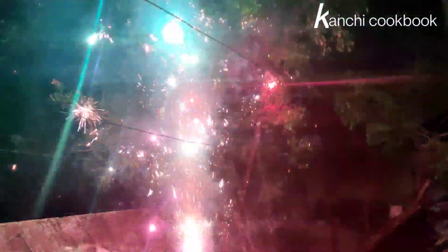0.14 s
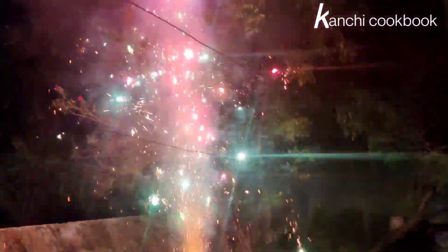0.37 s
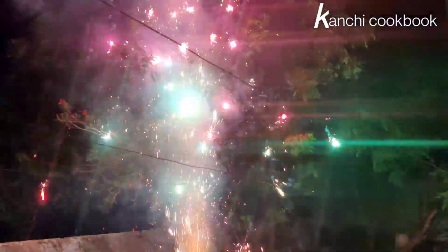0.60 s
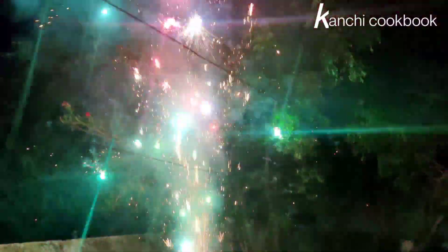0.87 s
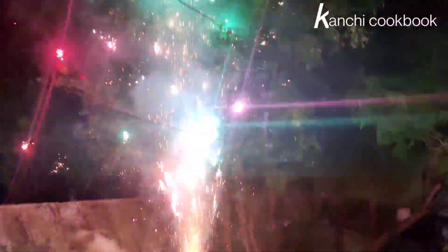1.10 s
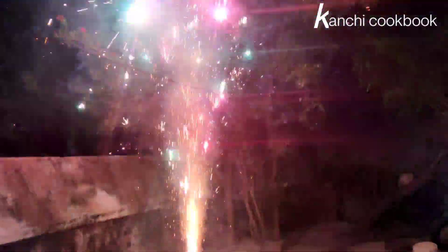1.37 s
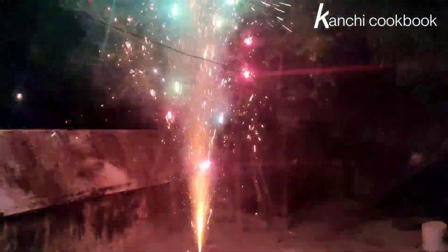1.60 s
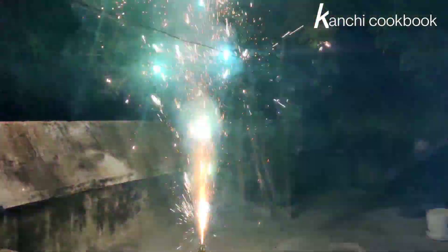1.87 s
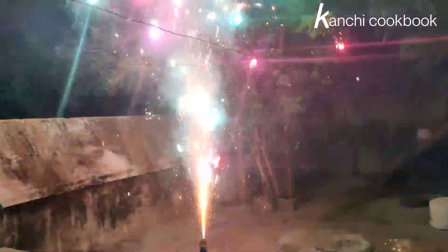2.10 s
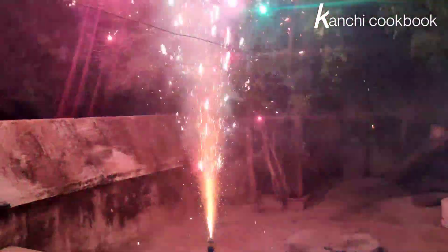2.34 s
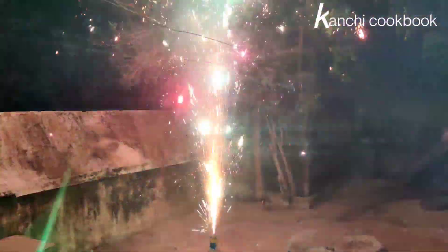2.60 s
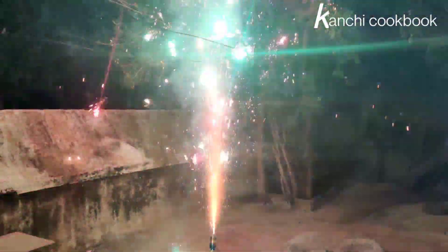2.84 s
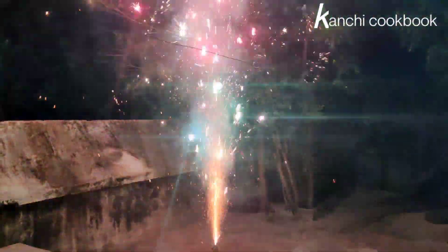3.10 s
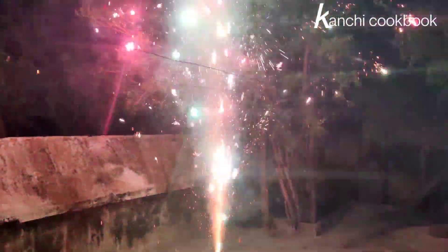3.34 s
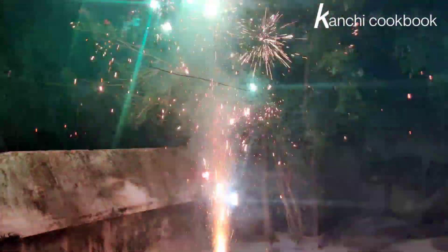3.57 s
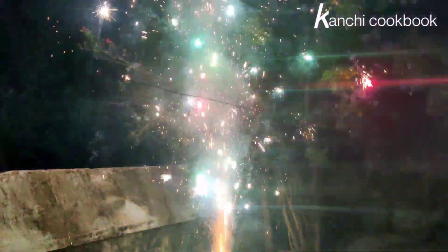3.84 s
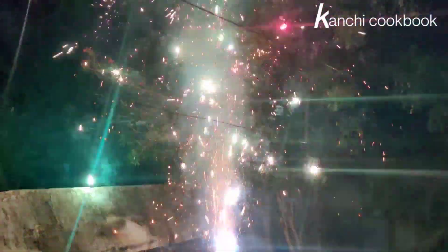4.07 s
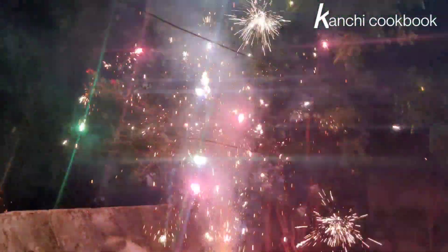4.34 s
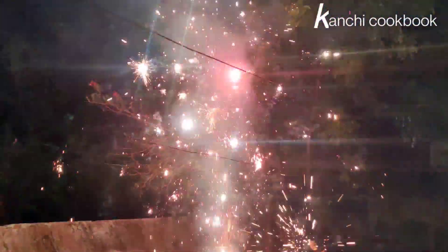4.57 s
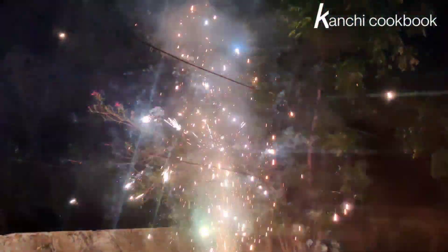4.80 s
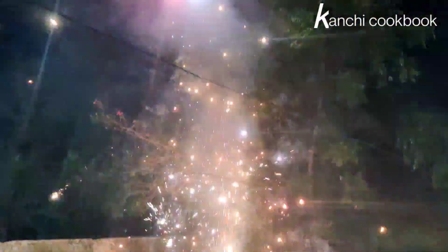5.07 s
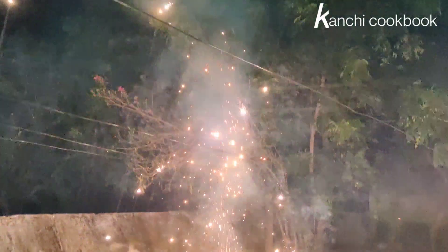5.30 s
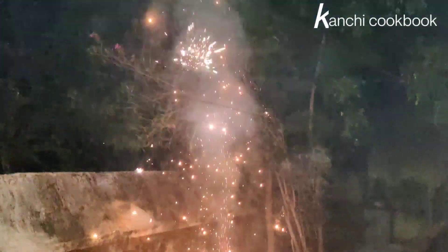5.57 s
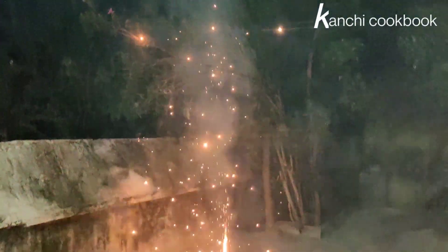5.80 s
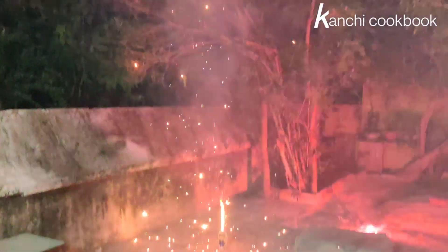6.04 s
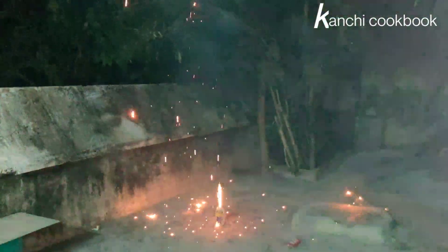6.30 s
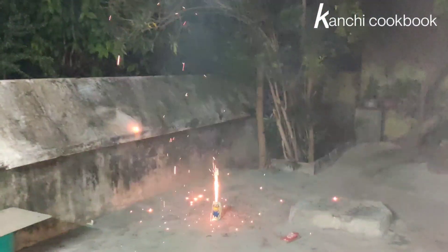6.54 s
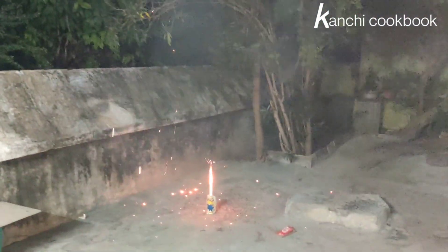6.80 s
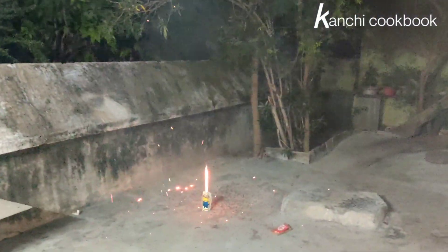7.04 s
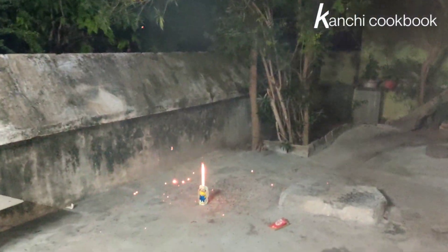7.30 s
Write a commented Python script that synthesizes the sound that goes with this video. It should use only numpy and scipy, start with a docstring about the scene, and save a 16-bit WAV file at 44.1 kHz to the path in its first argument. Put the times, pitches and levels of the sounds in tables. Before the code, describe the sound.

Harsh, fluctuating jet noise and dense tiny crackles start at once, with snapping star bursts, hollow thumps and quick slaps from ground and walls. The close stereo phone pickup clips, lurches and cuts out in places. Bursts peak past the middle, some late ones with short woody knocks. Then the hiss drops away to a weak sputter over a distant hum, with thin, high crickets emerging.

```python
"""A fountain firework burns in a walled yard at night, a few metres from a phone with two microphone ports.
From the start a jet of shaped noise hisses over a far hum, amid the sizzle of dense tiny impulses.
Stars soon burst as sharp spikes with ground bounces and hollow thumps; late on, decaying sines knock.
Meanwhile the microphones' resting points lurch and swing into clipping, which chokes the hiss.
At last the burn sinks to a faint glow, the hum, and crickets made of slightly wavering sines."""
import sys
import numpy as np
from scipy import signal
from scipy.fft import rfft, irfft
from scipy.io import wavfile
from scipy.ndimage import uniform_filter1d, minimum_filter1d

SR = 44100
rng = np.random.default_rng(int(sys.argv[2]) if len(sys.argv) > 2 else 0)


def waveform_to_disk(signal):
    """Save audio, clipped to [-1, 1], as 16-bit WAV at the path in sys.argv[1]."""
    frames = np.transpose(np.atleast_2d(signal))
    scaled = np.clip(frames, -1, 1) * 32767
    samples = np.round(scaled).astype(np.int16)
    wavfile.write(sys.argv[1], SR, samples)


def natural_amplitude(level_db):
    """Convert a level in decibels to a linear amplitude factor, elementwise."""
    exponent = np.asarray(level_db, float) / 20
    return 10 ** exponent


N = 326781  # length in samples


def shaped(x, points):
    """Minimum-phase filtering: (Hz, dB) points become a causal filter by folding the cepstrum of the log gain."""
    hz, db = np.transpose(points)
    grid = np.maximum(np.fft.rfftfreq(4096, 1 / SR), 1)
    log_gain = np.log(natural_amplitude(np.interp(np.log(grid), np.log(hz), db)))
    cepstrum = irfft(log_gain)
    cepstrum[1:2048] *= 2
    cepstrum[2049:] = 0
    response = irfft(np.exp(rfft(cepstrum)))[None, :2048]
    return signal.fftconvolve(x, response, axes=1)[:, :N]


def band(x, hz, width_hz):
    """Simple resonance: a second-order peak with gain 1 at its centre."""
    return signal.lfilter(*signal.iirpeak(hz, hz / width_hz, SR), x)


def level(x, db):
    """Root-mean-square scaling: the whole signal is brought to one rms level in dB."""
    return x * natural_amplitude(db) / np.sqrt(np.mean(x ** 2))


def curve(table):
    """Linear interpolation: rows of (seconds, value) are joined by straight lines."""
    return np.interp(np.arange(N) / SR, *np.transpose(table))


def walk(rate_hz):
    """Smoothed random modulation: random levels are held for one period and slewed twice; spread near 1."""
    hold = int(SR / rate_hz)
    steps = np.repeat(rng.standard_normal(N // hold + 1), hold)
    return uniform_filter1d(uniform_filter1d(steps, hold), hold)[:N] * 4 / 3


def clicks(seconds, sizes, lag_s):
    """Interaural-style delay: each impulse has its own direction, so it reaches the right port early or late."""
    at = np.clip((np.array([seconds, seconds + lag_s]) * SR).astype(int), 0, N - 1)
    return np.array([np.bincount(port, sizes, N) for port in at])


def decay(x, seconds):
    """Exponential relaxation: a one-pole filter prolongs each input by the given time constant."""
    return signal.lfilter([1], [1, -np.exp(-1 / (seconds * SR))], x)


def yard(x, t60_s, wet_db):
    """Diffuse reverberation: scattered echoes from ground, wall and trees decay, different at each port."""
    t = np.arange(int(.3 * SR)) / SR
    echo = rng.standard_normal((2, len(t))) * 1000 ** (-t / t60_s) * (t > .002)
    echo /= np.sqrt(np.sum(echo ** 2, axis=1, keepdims=True))
    return x + natural_amplitude(wet_db) * signal.fftconvolve(x, echo, axes=1)[:, :N]


# Flares of the charge, one after another and overlapping.
# Each row: start in seconds, relative level in dB, rise in seconds, hold in seconds.
FLARES = [(-0.005, -23.5, 0.0022, 0.093), (0.115, -22.5, 0.089, 0.091), (0.293, -20, 0.13, 0),
          (0.342, -22.5, 0.062, 0.29), (0.67, -23.5, 0.027, 0.061), (0.836, -28, 0.0012, 0.25),
          (0.862, -26, 0.047, 0.13), (1.113, -25.5, 0.002, 0.08), (1.2, -22.5, 0.063, 0.29),
          (1.204, -22.5, 0.001, 0.065), (1.496, -22.0, 0.029, 0.23), (1.764, -28.5, 0.035, 0.085),
          (1.878, -28.5, 0.032, 0.019), (1.924, -30, 0.047, 0.324), (2.006, -23, 0.0011, 0.051),
          (2.136, -24.5, 0.022, 0.038), (2.245, -26, 0.088, 0.25), (2.267, -22.5, 0.0015, 0.096),
          (2.465, -22.5, 0.044, 0.1), (2.517, -26.5, 0.13, 0.27), (2.684, -22.5, 0.079, 0.063),
          (2.824, -21.5, 0.065, 0.23), (3.124, -19, 0.006, 0.02), (3.246, -19.0, 0.098, 0.02),
          (3.313, -23, 0.063, 0.25), (3.56, -26, 0.087, 0.3), (3.586, -28, 0.021, 0.2),
          (3.67, -20.5, 0.062, 0.001), (3.767, -27, 0.0067, 0.02), (3.852, -24.5, 0.057, 0.32),
          (3.945, -14.5, 0.05, 0.034), (4.123, -12, 0.073, 0), (4.176, -29, 0.081, 0.25),
          (4.272, -20.5, 0.038, 0.044), (4.436, -21.5, 0.019, 0.045), (4.491, -22, 0.045, 0.22),
          (4.594, -18, 0.017, 0.059), (4.774, -21, 0.002, 0.0086), (4.779, -21.5, 0.029, 0.03),
          (4.851, -24, 0.04, 0.077), (4.99, -21, 0.0089, 0.071), (5.1, -28.5, 0.003, 0.013),
          (5.158, -27, 0.012, 0.024), (5.238, -16, 0.069, 0.00033), (5.227, -24.5, 0.0011, 0.028),
          (5.278, -27.5, 0.0017, 0.052), (5.368, -26, 0.07, 0.088), (5.39, -24, 0.001, 0.028),
          (5.585, -25, 0.022, 0.17), (5.5853, -22, 0.0009, 0.015), (5.826, -30, 0.015, 0.26),
          (5.9715, -27.5, 0.0017, 0.027), (6.058, -38, 0.044, 0.074), (6.199, -23.5, 0.0026, 0.093),
          (6.458, -40, 0.022, 0.25), (6.661, -24.5, 0.00093, 0.01)]
# The steady burn under the flares, from full tube to last glow. Each row: time in seconds, relative level in dB.
EMBER = [(0, -36.5), (5.9, -35.5), (6.35, -45), (7.41, -49.5)]


def burn_db():
    """Energy summation: flares rise, hold and fade at one rate; their powers add over the steady burn."""
    fade_db_per_s = 366
    t = np.arange(0, N / SR + .002, .001)[:, None]
    start, db, rise, hold = np.transpose(FLARES)
    fade_db = fade_db_per_s * np.maximum(t - start - rise - hold, 0)
    flares = natural_amplitude(db - fade_db) * np.clip((t - start) / np.maximum(rise, .001), 0, 1)
    ember = natural_amplitude(np.interp(t[:, 0], *np.transpose(EMBER)))
    power = np.sum(flares ** 2, axis=1) + ember ** 2
    return curve(np.c_[t, 10 * np.log10(power)])


# Colour of the burn before the ports. Each row: frequency in Hz, relative spectral density in dB per Hz.
BURN_COLOUR = [(30, 0.5), (150, -7.5), (300, 1), (500, -3.5), (1200, -1), (2000, 0.5), (3500, 2.5),
               (7000, 1), (12000, -0.5), (16000, -5)]


def burn(count=1500, size=5):
    """Turbulent noise with clustered impulses: the jet hisses under flurries of cracks as stars break up."""
    star, star_side, star_size = rng.random((count, 3, 1)).transpose(1, 0, 2)
    late, spark = -np.log(1 - rng.random((2, count, size)))
    when = star * N / SR + .006 * late
    # few large and many small
    spark_db = np.minimum(2.25 * spark + 8 * star_size, 24)
    loud_db = burn_db()
    lag = np.repeat(.0008 * (star_side - .5), size)
    cracks = clicks(when.ravel(), natural_amplitude(spark_db).ravel(), lag)
    cracks = level(signal.lfilter([1, -.4], [1], cracks - cracks.mean()), 0)
    # every spark sits somewhere else, so the yard answers each with its own short wash
    wash = np.sqrt(decay(cracks ** 2, 0.015)) * rng.standard_normal((2, N))
    cracks = cracks + level(wash, -3.5)
    # a weak burn throws few stars: mostly hiss
    cracks *= np.clip((loud_db + 31.0) / 22, 0, 1)
    # long waves reach both ports alike
    shared = signal.lfilter(*signal.butter(1, 500, fs=SR), rng.standard_normal(N))
    jet = rng.standard_normal((2, N)) + natural_amplitude(3.0) * shared
    # the jet is thin in the middle, where the cracks stand out
    jet = jet - 0.5 * band(jet, 1480, 1260)
    mix = shaped(level(jet, -6.0) + level(cracks, -3.5), BURN_COLOUR)
    return level(mix, -1.43) * natural_amplitude(loud_db)


# Spectrum of the night air. Each row: frequency in Hz, relative spectral density in dB per Hz.
NIGHT = [(24, -46), (40, 9.5), (123, -8.5), (186, -12.5), (415, -17), (1070, -23.5), (2000, -32.5),
         (4300, -29), (6600, -45), (14000, -48)]


def air():
    """Stationary broadband noise: a far hum, shaped towards the low end and steady in level."""
    return level(shaped(rng.standard_normal((2, N)), NIGHT), -41.5)


# Star bursts. Each row: start in seconds, relative spike level in dB, thump relative to crack in dB.
POPS = [(0.1328, -13, -17), (0.2074, -18.5, -6), (0.281, -5, -25), (0.444, -8, -28), (0.5082, -6, -27),
        (0.571, -1, -27.5), (0.7317, -8, -30), (0.8398, -19.5, -11.5), (0.9393, -3.5, -26),
        (0.9584, -4, -33), (1.054, -9, -21.5), (1.11, -8, -28), (1.155, -6, -27), (1.2061, -4.5, -26),
        (1.2206, -6.5, -15.5), (1.253, 0.5, -28), (1.3516, -6, -46), (1.4108, -3, -27.5),
        (1.447, -1.5, -27), (1.5932, -12, -33), (1.6487, -4, -26), (1.8275, -9, -25), (1.8423, -11, -15.5),
        (1.8603, -11, -20.5), (2.0103, -3.5, -25), (2.0154, -13, -11), (2.1132, -9, -18.5),
        (2.1433, -11.5, -14.5), (2.273, -8, -17), (2.2868, -12, -28), (2.5116, -3.5, -20.5),
        (2.7625, -5, -23), (2.7973, -9, -18.5), (2.8838, -4.5, -29), (2.9219, -9, -25), (2.9498, -14, -19),
        (3.1536, -6, -33), (3.182, -14, -24), (3.2791, -7, -23.5), (3.3675, -6.5, -26), (3.484, -5.5, -26),
        (3.5435, -9, -29), (3.586, -6, -25), (3.7838, 0.5, -31), (3.7959, -2.5, -26), (3.8566, -14.5, -19),
        (3.948, -11, -12), (3.9793, -5, -19), (4.0092, -1.5, -18), (4.0531, -10, -17.5),
        (4.112, -13.5, -16.5), (4.131, -10, -21), (4.1514, -2.5, -14.5), (4.1899, 7, -26),
        (4.2257, -12, -16.5), (4.2812, -13.5, -18), (4.3001, -6, -24), (4.359, -3, -25.5),
        (4.414, -18, -15.5), (4.484, -6.5, -18.5), (4.5378, -1.5, -24), (4.6054, 1.5, -22.5),
        (4.6113, -2, -17), (4.6214, -1, -21), (4.6278, -4, -13), (4.6637, -7, -32), (4.7072, -5, -24),
        (4.773, -9, -24), (4.8, -7, -20), (4.8302, 0, -29), (4.886, -10.5, -14), (4.9837, -5, -19.5),
        (5.004, -6.5, -19), (5.0451, -6.5, -20), (5.073, -4, -32), (5.0974, -14, -19), (5.2262, -4.5, -20),
        (5.2795, -2.5, -27), (5.303, 0, -32), (5.3945, -16, -12.5), (5.4812, 3, -26), (5.5884, -6.5, -22),
        (5.6013, -1.5, -25), (5.6798, 1.5, -27), (5.7253, -6.5, -24.5), (5.7542, -7.5, -26),
        (5.9767, -7.5, -20), (6.0418, -10.5, -22), (6.2015, -6, -17), (6.215, -4.5, -49),
        (6.6572, -15, -54), (6.6663, -9.5, -27)]
# Hollow body of a burst. Each row: resonance in Hz, width in Hz, gain in dB.
THUMP = [(380, 1210, 32.5), (760, 430, 25)]


def pops(count=2):
    """Impulse with early reflections: a spike, ground bounces some 2 ms apart, a thump and the yard's reply."""
    start, db, thump_db = np.transpose(POPS)
    chance = rng.random((len(start), 2 * count + 1))
    late = np.c_[0 * start, np.cumsum(.0019 + .0007 * chance[:, :count], axis=1)]
    loss_db = np.c_[0 * start, np.cumsum(2.5 + 4 * chance[:, count:-1], axis=1)]
    size = natural_amplitude(db[:, None] - loss_db)
    lag = np.repeat(0.00017 * (chance[:, -1] - .5), count + 1)
    when = (start[:, None] + late).ravel()
    spikes = clicks(when, size.ravel(), lag)
    # the shell tears for a fraction of a millisecond behind the spike
    tear = decay(spikes, 0.00022) * rng.standard_normal((2, N))
    crack = signal.lfilter([.7, -.14, -.42], [1, -.3], spikes + natural_amplitude(-2.0) * tear)
    push = clicks(when, (size * natural_amplitude(thump_db[:, None])).ravel(), lag)
    thump = sum(natural_amplitude(gain_db) * band(push, hz, width) for hz, width, gain_db in THUMP)
    dulled = signal.lfilter(*signal.butter(1, 9000, fs=SR), crack)
    # the low end lingers longer between the walls
    return yard(natural_amplitude(4) * dulled, .05, -11) + yard(thump, 0.13, -2.2)


# Short hollow knocks, each on its own note.
# Each row: start in seconds, peak level in dB before the yard's echoes, frequency in Hz.
KNOCKS = [(5.279, -14, 1185), (5.589, -24, 960), (5.686, -24, 1140), (6.012, -24.5, 910), (6.657, -22, 870),
          (6.669, -19, 683)]


def knocks():
    """Damped free vibration: each knock is an exponentially dying note, prolonged by the yard."""
    t60_s = 0.023
    t = np.arange(N) / SR
    notes = np.zeros(N)
    for start, db, hz in KNOCKS:
        fade = 1000. ** (-np.abs(t - start) / t60_s) * (t > start)
        notes += natural_amplitude(db) * np.sin(2 * np.pi * hz * (t - start)) * fade
    return yard(np.array([notes, notes]), 0.25, -1)


# Cricket songs; a row that starts beyond the scene's end stays silent.
# Each row: mean frequency in Hz, mean peak level in dB, start in seconds, end in seconds.
CRICKETS = [(2980, -64, 6.45, 6.68), (3640, -59.5, 6.72, 8.8), (4170, -62, 6.2, 8.6), (4400, -66, 18, 8.3),
            (4550, -63, 6.75, 8.6), (5717, -69, 8.1, 8.7)]


def crickets():
    """Slow frequency and amplitude modulation: thin sines waver slightly in pitch and level."""
    song = np.zeros(N)
    for hz, db, start, end in CRICKETS:
        phase = 2 * np.pi * np.cumsum(hz + 12 * walk(40)) / SR
        loud = natural_amplitude(db + 1.8 * walk(12))
        gate = curve([(start - .05, 0), (start, 1), (end, 1), (end + 0.031, 0)])
        song += np.sin(phase) * loud * gate
    return song


# Resonances of the left, then the right microphone port. Each row: centre in Hz, width in Hz, gain in dB.
PORTS = [(5790, 705, 11.5), (9530, 1010, 10)]


def ring_ports(dry):
    """Cavity resonance: each microphone port boosts the sound around its own pitch."""
    return np.array([x + (natural_amplitude(db) - 1) * band(x, hz, width) for x, (hz, width, db) in zip(dry, PORTS)])


def limit(x):
    """Look-ahead gain reduction: each peak is seen coming and ducks both channels a few milliseconds early."""
    coming = -minimum_filter1d(-np.abs(x).max(axis=0), size=441, origin=-130)
    return x * uniform_filter1d(np.minimum(natural_amplitude(1.5) / (coming + 1e-9), 1), size=60)


# Sudden jumps of the resting point: one list for the left microphone, then one for the right.
JOLTS = [
    [(0.1374, 0.46), (0.1503, -0.043), (0.1822, -1.1), (0.7607, -0.1), (0.9307, -0.23), (1.7671, -0.28),
     (2.0145, 1.26), (2.0923, -0.45)],
    [(0, -0.86), (0.08, 0.46), (0.2057, -0.7), (0.286, 0.27), (0.51, 0.22), (0.7634, 0.36), (0.833, -0.47),
     (1.0603, 0.38), (1.297, 0.36), (1.4494, 0.17), (1.7669, -0.33), (1.9033, -0.62), (2.1115, 0.82),
     (2.2706, -0.65), (2.505, -0.22), (2.5095, 0.87), (2.7555, 0.12), (3.1644, 0.35), (3.257, -0.38),
     (3.7962, 0.17), (3.8293, 0.34), (3.854, -0.41), (3.8975, -0.16), (3.943, 0.17), (3.9478, -0.6),
     (4.011, 0.47), (4.0678, -0.59), (4.1267, 0.46), (4.225, -0.62), (4.383, 0.34), (4.432, -0.33),
     (4.448, -0.45), (4.4819, 1.4), (4.537, -0.67), (4.8426, 0.33), (5.004, -0.45), (5.2277, -1.27),
     (5.394, 0.3), (5.4888, 0.34), (5.5725, -0.22), (6.2017, 0.9)],
]
# Slower swings of the resting point: one list for the left microphone, then one for the right.
SWINGS = [
    [(0.17, -1.2, 0.016), (0.199, 0.59, 0.0032), (0.244, 1.67, 0.031), (0.271, 0.48, 0.15),
     (0.396, -0.53, 0.034), (0.893, 0.46, 0.05), (0.959, 0.23, 0.07), (1.822, 0.66, 0.0087),
     (1.842, 0.21, 0.012), (2.004, -0.18, 0.016), (2.014, 0.45, 0.016), (2.044, -0.32, 0.013),
     (2.055, -1.16, 0.031), (2.058, -0.36, 0.008), (2.096, 0.7, 0.0144), (2.307, 0.74, 0.067),
     (2.436, 0.23, 0.038)],
    [(0.041, 0.44, 0.02), (0.131, -0.43, 0.0075), (0.346, 0.45, 0.044), (0.43, 0.13, 0.0034),
     (0.8, -0.67, 0.033), (0.923, 0.5, 0.096), (1.109, -1, 0.068), (1.511, -1.2, 0.075),
     (1.58, 0.2, 0.0059), (1.822, 0.4, 0.014), (1.842, 2.5, 0.021), (1.854, 1, 0.041), (1.911, -2, 0.017),
     (1.925, -2.5, 0.007), (1.955, 0.63, 0.027), (2.005, -0.34, 0.0083), (2.175, -1.5, 0.042),
     (2.182, -0.1, 0.0067), (2.318, 1.9, 0.17), (2.331, 0.27, 0.066), (2.565, -1.9, 0.18),
     (2.68, 0.93, 0.087), (2.77, 0.42, 0.12), (3.2, -0.74, 0.032), (3.262, -0.16, 0.044),
     (3.339, 0.25, 0.013), (3.412, 0.68, 0.12), (3.472, -0.5, 0.012), (4.118, 0.84, 0.032),
     (4.189, 0.2, 0.027), (4.51, -0.44, 0.032), (4.6, 1, 0.24), (4.905, -1.12, 0.077), (5.054, 1.6, 0.072),
     (5.169, -2.5, 0.03), (5.297, 0.7, 0.054), (5.383, -0.05, 0.00999), (5.437, -0.5, 0.022),
     (5.462, -0.22, 0.01), (5.512, -1.24, 0.093), (5.53, -0.35, 0.0094), (5.622, -0.64, 0.027),
     (5.687, -0.5, 0.15), (5.84, 0.67, 0.038), (6.188, -1.5, 0.21), (6.264, -2.5, 0.15), (6.381, 0.5, 0.03),
     (6.448, 1.1, 0.36)],
]


def resting_point():
    """Critically damped return: jolts and swings push each port's resting point, which settles back to zero."""
    jolt_s, settle_hz = 0.00046, 1.5
    speed = np.zeros((2, N))
    for port in range(2):
        pushes = [(*row, jolt_s) for row in JOLTS[port]] + list(SWINGS[port])
        for start_s, travel, length_s in pushes:
            start = max(int(start_s * SR), 0)
            steps = max(int(min(length_s, start_s) * SR), 1)
            speed[port, start:start + steps] += travel / steps
    pole = np.exp(-2 * np.pi * settle_hz / SR)
    return signal.lfilter([1, -1], [1, -2 * pole, pole ** 2], speed)


def overload(ported):
    """Saturation about a moving bias: sound rides on the resting point and is squashed near the rails."""
    clip_level, knee = .92, 6  # full scale = 1; a higher knee is harder
    drift = uniform_filter1d(resting_point(), size=8, axis=1, origin=-4)
    # sound over the threshold briefly pulls the resting point most of the way to zero
    over = np.clip((ported - natural_amplitude(-5)) / natural_amplitude(-12.0), 0, 1)
    pull = np.minimum(decay(over, 0.00025), 1)
    x = drift * (1 - 0.87 * pull) + ported / clip_level
    return clip_level * x / (1 + x ** knee) ** (1 / knee)


def scene():
    """Linear superposition: burn, air, bursts, knocks and crickets add at the two ports."""
    return burn() + air() + pops() + knocks() + crickets()


def roll_off(x):
    """The treble ends steeply here."""
    return signal.sosfilt(signal.butter(12, 16510, fs=SR, output="sos"), x)


def record(dry):
    """Transduction chain: port resonance, limiting, overload about the resting point and a top cut."""
    squashed = overload(limit(ring_ports(dry)))
    top_cut = signal.ellip(6, .2, 30, 15600, fs=SR, output="sos")
    # the filter starts from the first value, so that no step is heard
    first = squashed[:, :1]
    mix = signal.sosfilt(top_cut, squashed - first) + first
    return roll_off(mix)


dry = scene()
out = record(dry)
waveform_to_disk(out)
```